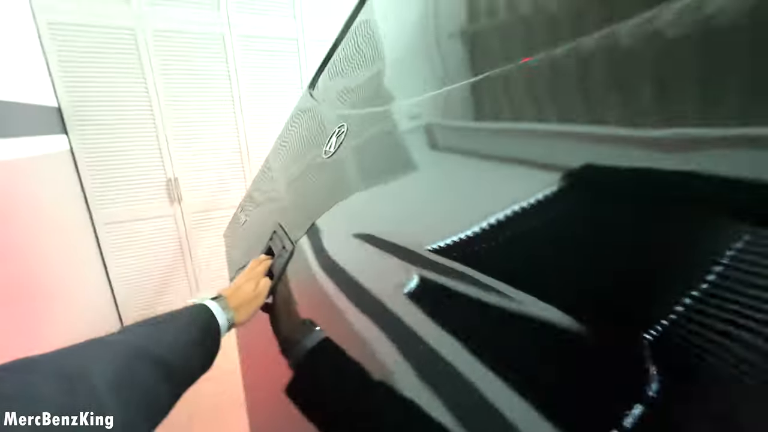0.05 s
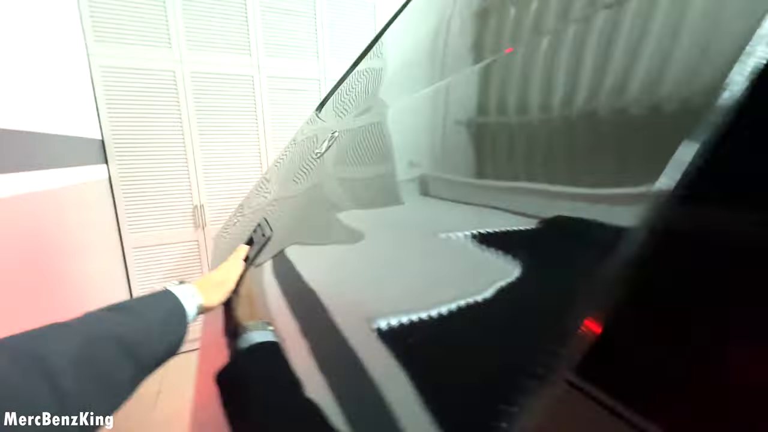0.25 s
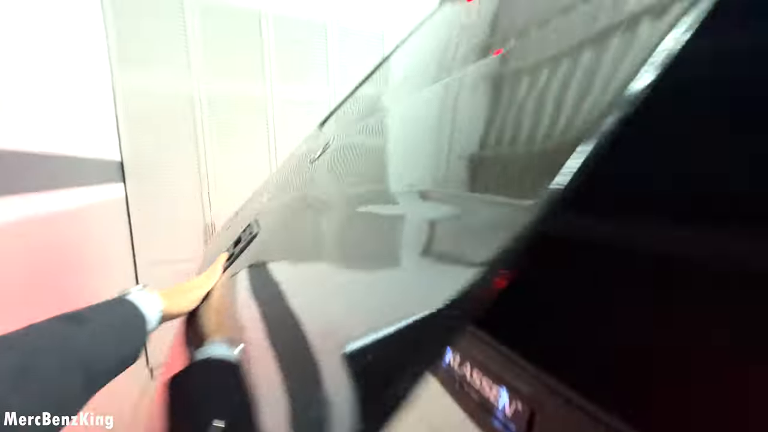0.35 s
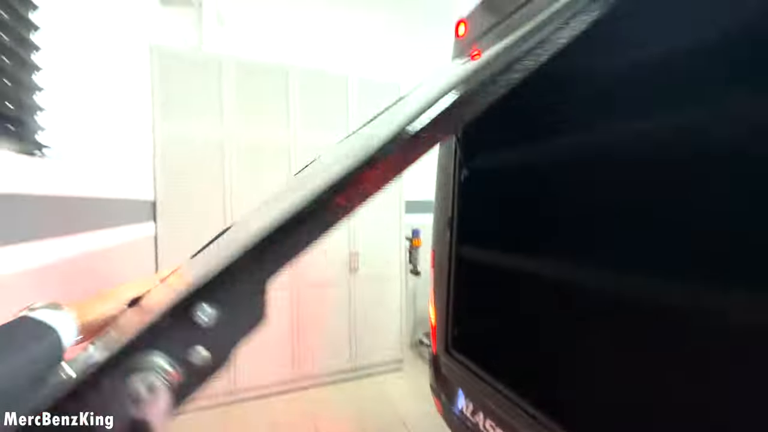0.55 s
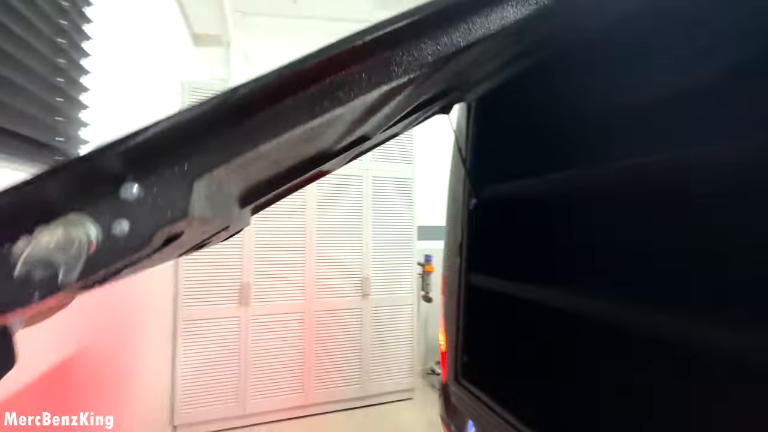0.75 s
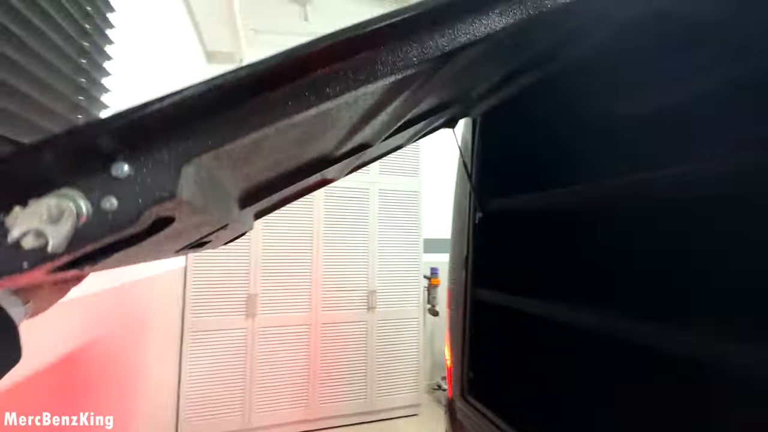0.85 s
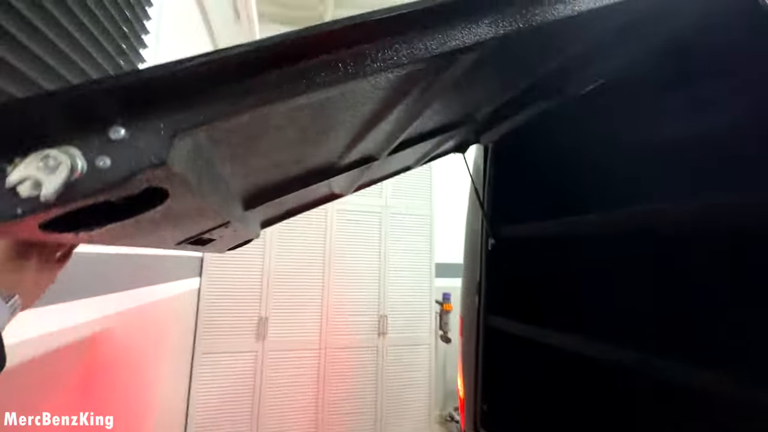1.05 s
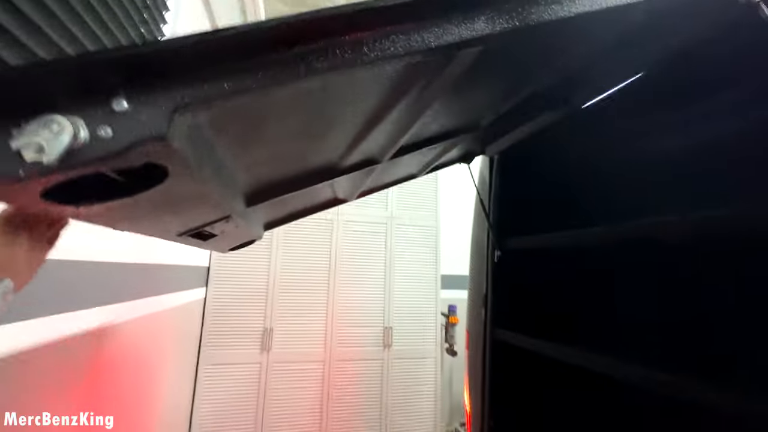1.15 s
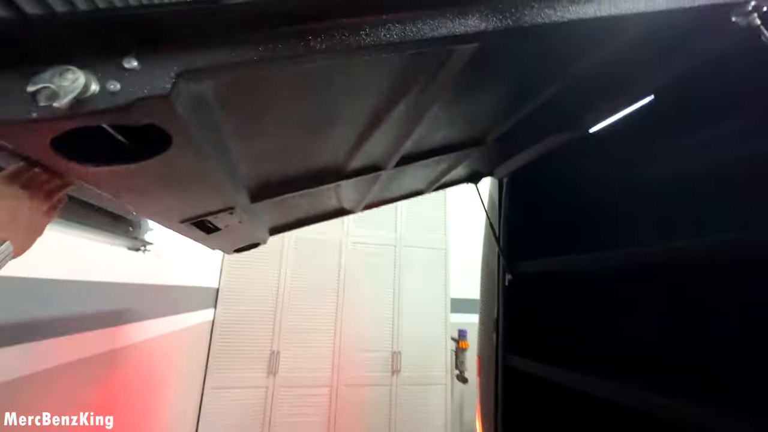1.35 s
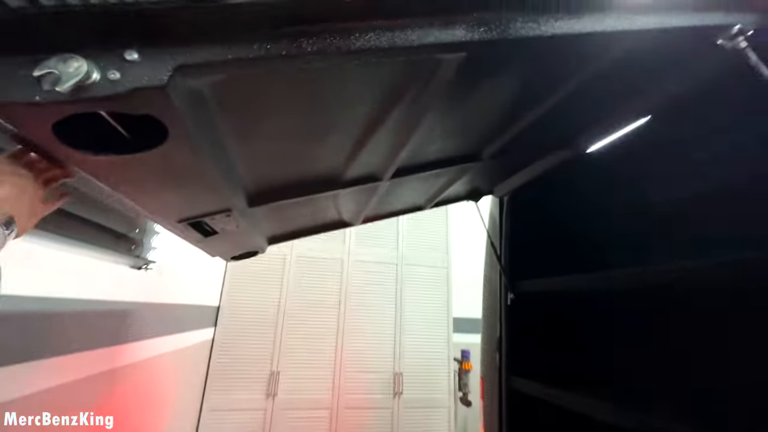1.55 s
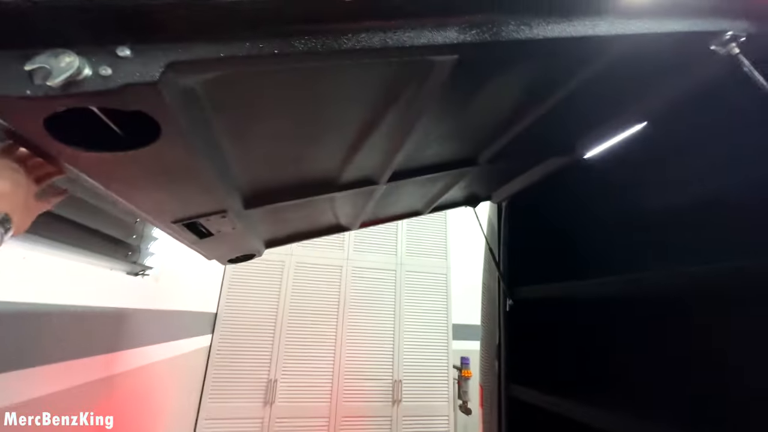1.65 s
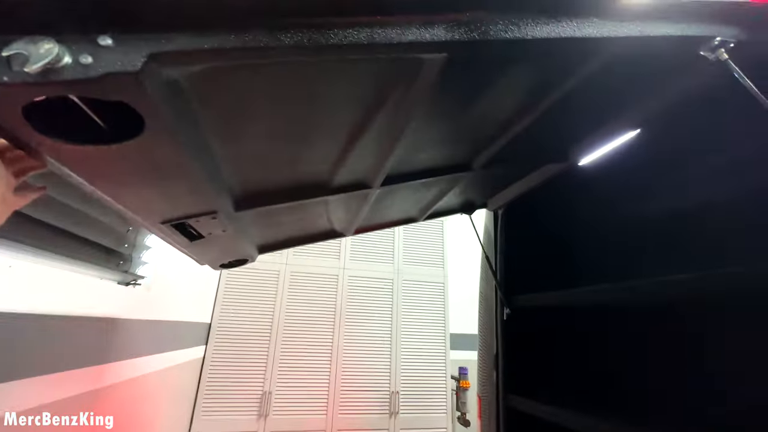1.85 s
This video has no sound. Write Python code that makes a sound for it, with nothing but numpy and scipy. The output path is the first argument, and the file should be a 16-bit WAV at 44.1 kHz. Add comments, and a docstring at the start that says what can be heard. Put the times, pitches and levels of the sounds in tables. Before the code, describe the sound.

Heard from just below, a powered van tailgate lifts with a motor whine and strut hiss. One sharp latch clunk and light knocks come early, then the whine falls and fades with a high whistle over faint indoor ventilation.

```python
"""A van's powered tailgate swings up in a quiet showroom, heard from just below it.
Over humming ventilation the drive whines and whirs up to speed and the sliding struts hiss.
Half a second in, the latch clunks once, trailed by a few light knocks. The drive slows and
its pitch sinks; the strut seals squeal, and a high whistle plunges as the gate comes to rest."""
import sys
import numpy as np
from scipy import signal
from scipy.fft import rfft, irfft
from scipy.io import wavfile

SR = 44100
rng = np.random.default_rng(int(sys.argv[2]) if len(sys.argv) > 2 else 0)


def master_out(mix):
    """Clip the mix to full scale and print it as 16-bit PCM to the path in sys.argv[1]."""
    frames = np.transpose(np.atleast_2d(mix))
    ceiling = np.clip(frames, -1, 1)
    pcm = np.round(ceiling * 32767).astype(np.int16)
    wavfile.write(sys.argv[1], SR, pcm)


N = 83790
T = np.arange(N) / SR
IMPACT_RISE_S, IMPACT_ROOM_DB = .00069, -11
# colour of the rattling door: f/Hz, density/dB
RATTLE = [(150, -21), (400, -7), (800, -13.5), (2000, -5.5), (3500, -9.5), (6000, -11.5), (9000, -15.5),
          (16000, -23)]


def drive_whine():
    """The drive sings at a pitch that follows its speed; a rougher whine falls away early on."""
    pitch = [(0, 1260), (.2, 1391), (.33, 1534), (.47, 1640), (.56, 1503), (.68, 1343), (.82, 1296),
             (1.0, 1190), (1.13, 1105), (1.28, 1018), (1.45, 962), (1.9, 877)]  # main glide: t/s, f/Hz
    level = [(0, -63), (.22, -56), (.35, -53), (.48, -52.5), (.62, -49.5), (.78, -58), (.98, -71),
             (1.12, -60), (1.22, -72), (1.34, -61), (1.5, -84), (1.9, -84)]  # its swells: t/s, level/dB
    partials = [(2, -0.5), (3, -3.5), (4, -7.5)]  # its overtones: multiple, level/dB
    partial_level = [(0, -91), (.4, -63.5), (.48, -58.5), (.6, -59.5), (.95, -64), (1.201, -66),
                     (1.36, -68.5), (1.55, -73), (1.9, -93)]  # their shared fader: t/s, level/dB
    falling = [(0, 2650, -76), (.15, 2467, -60), (.27, 2170, -54.5), (.33, 1957, -55.5), (.41, 1822, -58),
               (.47, 1774, -44.5), (.52, 1730, -44), (.6, 1650, -86)]  # second whine: t/s, f/Hz, level/dB
    fall_partials = [(2, -6), (3, 2)]  # its overtones: multiple, level/dB
    fall_partial_level = [(0, -84), (.15, -66.5), (.29, -55.5), (.38, -72), (.47, -61), (.55, -72),
                          (.6, -120)]  # their shared fader: t/s, level/dB
    hz, = curve(pitch)
    core = tone(hz, wobble=.014, wobble_rate=61, flutter_db=1)
    whine = fader(level) * (core + from_db(-5) * rasp(hz, width_hz=286))
    whine += overtones(hz, partials, partial_level)
    fall_hz, fall_db = curve(falling)
    whine += from_db(fall_db) * rasp(fall_hz, width_hz=155)
    whine += overtones(fall_hz, fall_partials, fall_partial_level)
    return whine + from_db(-13.5) * room(whine)


def overtones(hz, partials, level):
    """Rough overtones riding on a gliding pitch."""
    return fader(level) * sum(from_db(db) * rasp(round(k) * hz, width_hz=250) for k, db in partials)


def drive_body():
    """Meshing teeth whir, a thin tone holds, and the door panel drones while the drive runs."""
    whir_level = [(0, -51), (.18, -53.5), (.29, -45), (.37, -50), (.5, -47), (.64, -49), (.74, -48.5),
                  (.86, -52.5), (1.1, -54.5), (1.25, -54.5), (1.4, -60.5), (1.55, -66.5), (1.9, -91)]  # gear whir: t/s, level/dB
    whir_colour = [(200, 1.5), (500, 0), (900, 2), (1500, -2), (2500, -3.5), (4000, -6), (6000, -7),
                   (7300, -1.5), (8400, -10.5), (10000, -3), (12000, -11.5), (16000, -10)]  # its spectrum: f/Hz, density/dB
    steady_level = [(0, -62), (.5, -65.5), (.72, -60.5), (1.9, -61)]  # thin tone: t/s, level/dB
    drone_level = [(0, -56.5), (.1, -49), (.35, -57.5), (.6, -61.5), (.72, -57), (.95, -58), (1.1, -56),
                   (1.35, -58), (1.6, -67.5), (1.9, -83)]  # panel drone: t/s, level/dB
    panel = [(132, 75, -7), (281, 55, 0), (388, 90, -3.5), (569, 216, -3)]  # panel resonances: f/Hz, width/Hz, level/dB
    teeth_per_s, spread_db = 2200, 6
    teeth = (rng.random(N) < teeth_per_s / SR) * rng.standard_normal(N)
    teeth *= from_db(spread_db * rng.standard_normal(N))
    whir = fader(whir_level) * coloured(.2 * rms_one(teeth) + rng.standard_normal(N), whir_colour)
    steady = fader(steady_level) * tone(hz=699, wobble=.0022, wobble_rate=8, flutter_db=.5)
    return whir + steady + fader(drone_level) * resonate(panel)


def struts():
    """The sliding struts hiss in narrow resonances and whistle high up in two fluttering strands."""
    hiss_level = [(0, -57.5), (.08, -52), (.18, -48.5), (.27, -44), (.42, -40.5), (.55, -42.5), (.66, -41),
                  (.76, -47.5), (.88, -57), (.95, -55.5), (1.1, -54), (1.25, -53), (1.36, -59), (1.45, -67),
                  (1.56, -97), (1.9, -74)]  # sliding hiss: t/s, level/dB
    resonances = [(7100, 450, -12), (9225, 60, -3.5), (9380, 100, -3), (9650, 90, -2), (9900, 400, -10),
                  (10270, 100, -7), (10750, 450, -8), (11150, 240, -4), (12280, 200, -15),
                  (12800, 400, -13), (13800, 350, -13), (15200, 900, -18)]  # strut resonances: f/Hz, width/Hz, level/dB
    glide = [(.8, 13500, -66), (.95, 13600, -69), (1.03, 13960, -60), (1.07, 14570, -62),
             (1.14, 15000, -54), (1.2, 15100, -59), (1.3, 12960, -60), (1.36, 10770, -56.5),
             (1.4, 9460, -54.5), (1.43, 9250, -72), (1.47, 9200, -84)]  # the whistle's climb and plunge: t/s, f/Hz, level/dB
    strands = [(1, -1), (.915, -4)]  # its strands: pitch ratio, level/dB
    hiss = from_db(curve(hiss_level)[0] + .99 * drift(33)) * resonate(resonances)
    hz, db = curve(glide)
    whistle = 0
    for ratio, strand_db in strands:
        flutter_db = 3.5 * np.clip(drift(22), -2, 1)
        whistle += from_db(db + strand_db + flutter_db) * rasp(ratio * hz, width_hz=480)
    low_cut = signal.butter(12, 9000, "high", fs=SR, output="sos")
    return hiss + signal.sosfilt(low_cut, whistle)


def seals():
    """The strut seals give short, breathy squeals."""
    squeals = [(0.91, 0.31, 6900, -59.5), (0.87, 0.084, 17000, -47), (0.91, .13, 11900, -56),
               (1.385, 0.03, 9370, -44)]  # each squeal: start/s, length/s, f/Hz, level/dB
    attack_s, release_s = .013, .082
    out = 0
    for start, length, hz, db in squeals:
        fade_in = (T - start) / attack_s
        fade_out = (start + length - T) / release_s + .5
        out += from_db(db) * np.clip(np.minimum(fade_in, fade_out), 0, 1) * rasp(hz, width_hz=190)
    return out


def latch():
    """The latch lets go with a crack; the panel twangs, lows arriving last, and thuds late."""
    crack_colour = [(300, -36), (900, 1.5), (2100, 7.5), (3200, 3.5), (4300, 8), (6200, -1), (8300, -3),
                    (11000, -21), (16000, -29)]  # sharp crack: f/Hz, density/dB
    twang_level = [(0, -49), (.003, -22.5), (.008, -35.5), (.016, -40), (.028, -44), (.038, -60),
                   (.055, -80)]  # panel twang: t/s after the clunk, level/dB
    thud_bands = [(273, 60, -1), (440, 220, 4.5), (740, 180, -0.5)]  # panel thud: f/Hz, width/Hz, level/dB
    clunk_s = .5127
    from_hz, to_hz, glide_s = 1280, 197, .0125
    crack = from_db(-23) * burst(clunk_s, IMPACT_RISE_S, hold=.0033, t60=.016) * noise(crack_colour)
    hz = to_hz + (from_hz - to_hz) * np.exp(-np.maximum(T - clunk_s, 0) / glide_s)
    sounding = (T > clunk_s) & (T < clunk_s + twang_level[-1][0])
    twang = sounding * fader(twang_level, clunk_s) * np.sin(2 * np.pi * np.cumsum(hz * sounding) / SR)
    thud = from_db(-37) * burst(clunk_s + .014, rise=.017, hold=.017, t60=.064) * resonate(thud_bands)
    clunk = crack + twang + thud + knocks()
    return clunk + from_db(IMPACT_ROOM_DB) * room(clunk)


def knocks():
    """Each blow rattles the door and rings the latch, with a new balance of modes."""
    blows = [(0.5142, -27.5, 0.088), (.529, -38, 0.083), (.622, -48, 0.21), (0.6333, -46.5, 0.3)]  # hits on latch and door: t/s, level/dB, rattle t60/s
    modes = [(722, -5.5, .11), (830, -7.5, 0.061), (1091, -1, 0.078), (1448, 3, 0.05), (1750, -4, 0.085),
             (2027, -1, 0.15), (2320, 2, 0.053), (2440, 0, 0.06), (2848, -33, .12), (2960, -6, .1),
             (4150, -14, 0.11), (4176, -6, 0.12), (4780, -16, 0.12), (5970, -4, 0.06)]  # latch modes: f/Hz, relative level/dB, t60/s
    ring_db, spread_db = -5, 2
    rattle = noise(RATTLE)
    out = 0
    for start, db, t60 in blows:
        out += from_db(db) * burst(start, IMPACT_RISE_S, 0, t60) * rattle
        for hz, mode_db, ring_s in modes:
            strength, polarity = rng.standard_normal(2)
            gain = from_db(db + ring_db + mode_db + spread_db * strength) * np.sign(polarity)
            out += gain * burst(start, IMPACT_RISE_S, 0, ring_s) * np.sin(2 * np.pi * hz * (T - start))
    return out


def linkage():
    """The linkage ticks and the door panel bumps softly as the gate moves."""
    tick_hits = [(0.2984, -39, 1240), (0.3035, -39, 1440), (1.5851, -53, 1820)]  # small ticks: t/s, level/dB, f/Hz
    bump_hits = [(0.682, -46.5), (1.021, -51.5), (1.693, -53.5)]  # soft bumps: t/s, level/dB
    bump_colour = [(40, -10), (120, 0), (280, 5), (500, -5.5), (1500, -52), (16000, -80)]  # their dull body: f/Hz, density/dB
    tick_width_hz = 680
    splash = from_db(-8) * noise(RATTLE)
    ticks = 0
    for start, db, hz in tick_hits:
        envelope = from_db(db) * burst(start, IMPACT_RISE_S, hold=IMPACT_RISE_S, t60=.025)
        ticks += envelope * (resonate([(hz, tick_width_hz, 0)]) + splash)
    bumps = sum(from_db(db) * burst(start, rise=.0055, hold=.011, t60=.04) for start, db in bump_hits)
    bumps *= noise(bump_colour)
    return ticks + from_db(IMPACT_ROOM_DB) * room(ticks) + bumps


def ventilation():
    """A low bed of rushing air with a few fan tones."""
    fan_tones = [(128, -66.5), (400, -67.5), (900, -72)]  # fan hum: f/Hz, level/dB
    air_colour = [(25, -5), (60, -2), (110, 1.5), (190, -0.5), (300, 1.5), (500, -6), (850, -8),
                  (1200, -13.5), (2500, -20), (5000, -23), (10000, -27), (16000, -28.5)]  # rush of air: f/Hz, density/dB
    hum = sum(from_db(db) * tone(hz, wobble=.0027, wobble_rate=9.3, flutter_db=2.5)
              for hz, db in fan_tones)
    return hum + from_db(-56) * noise(air_colour)


def room(x):
    """The showroom's diffuse, slightly dull reverb, wet only."""
    tail = rng.standard_normal(N) * burst(0, rise=.0067, hold=.0067, t60=.57)
    tail = signal.sosfilt(signal.butter(1, 15000, fs=SR, output="sos"), tail)
    return signal.fftconvolve(x, tail / np.sqrt(np.sum(tail ** 2)))[:N]


def from_db(db):
    """Decibels to gain."""
    return 10 ** (np.asarray(db) / 20)


def rms_one(x):
    """Scale to unit power."""
    return x / np.sqrt(np.mean(x ** 2) + 1e-20)


def curve(rows, start=0):
    """The columns of a table, joined by straight lines in time."""
    times, *columns = np.transpose(rows)
    return [np.interp(T - start, times, column) for column in columns]


def fader(rows, start=0):
    """Gain automation from rows of t/s, level/dB."""
    return from_db(curve(rows, start)[0])


def burst(start, rise, hold, t60):
    """Envelope of a blow: linear attack, exponential decay from `hold` seconds after the start."""
    age = T - start
    return np.clip(age / rise, 0, 1) * from_db(-60 * np.maximum(age - hold, 0) / t60)


def drift(rate_hz):
    """Smooth random modulation; unit power."""
    pole = np.exp(-2 * np.pi * rate_hz / SR)
    return rms_one(signal.lfilter([1], [1, -2 * pole, pole * pole], rng.standard_normal(N + SR))[SR:])


def coloured(x, spectrum):
    """Shape a signal with a smooth EQ curve; unit power."""
    hz, db = np.transpose(spectrum)
    bins = np.maximum(np.arange(N // 2 + 1) * SR / N, 1)
    eq = from_db(np.interp(np.log(bins), np.log(hz), db))
    return rms_one(irfft(rfft(x) * eq, N))


def noise(spectrum):
    """Coloured noise; unit power."""
    return coloured(rng.standard_normal(N), spectrum)


def resonate(bands):
    """Noise ringing in a set of resonances; unit power."""
    out = 0
    for hz, width, db in bands:
        band = signal.butter(2, [hz - width / 2, hz + width / 2], "band", fs=SR, output="sos")
        out += from_db(db) * rms_one(signal.sosfilt(band, rng.standard_normal(N + SR // 2))[SR // 2:])
    return rms_one(out)


def tone(hz, wobble, wobble_rate, flutter_db):
    """A sine wavering in pitch and level; unit power."""
    phase = 2 * np.pi * np.cumsum(hz * (1 + wobble * drift(wobble_rate))) / SR
    return rms_one(np.sin(phase) * from_db(flutter_db * drift(26.7)))


def rasp(hz, width_hz):
    """A breathy band of noise around a steady or gliding pitch; unit power."""
    phase = 2 * np.pi * np.cumsum(hz * np.ones(N)) / SR
    slow = signal.butter(2, width_hz / 2, fs=SR, output="sos")
    a, b = signal.sosfilt(slow, rng.standard_normal((2, N + SR // 2)))[:, SR // 2:]
    return rms_one(a * np.cos(phase) + b * np.sin(phase))


def scene():
    """A mono mix, alike in both channels."""
    mix = drive_whine() + drive_body() + struts() + seals() + latch() + linkage() + ventilation()
    return np.tile(mix, (2, 1))


def record(dry):
    """A steep high cut takes off the very top."""
    return signal.sosfilt(signal.ellip(12, .1, 80, 15750, fs=SR, output="sos"), dry)


dry = scene()
out = record(dry)
master_out(out)
```